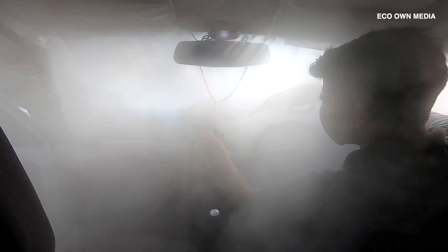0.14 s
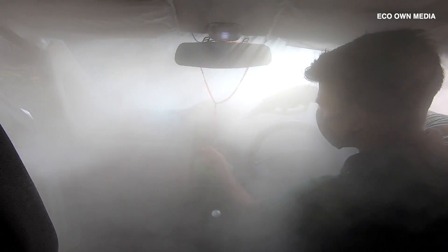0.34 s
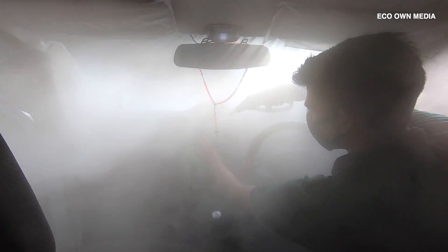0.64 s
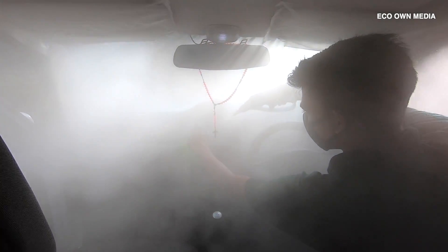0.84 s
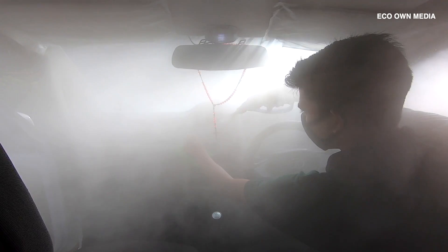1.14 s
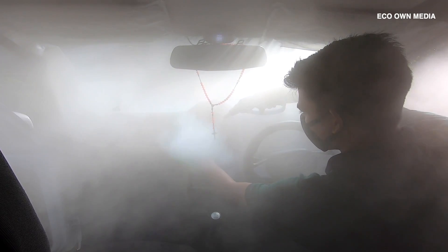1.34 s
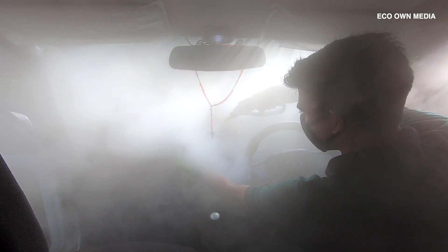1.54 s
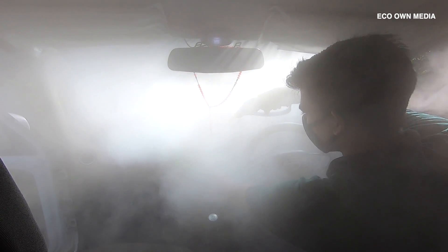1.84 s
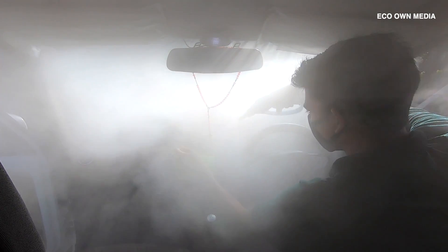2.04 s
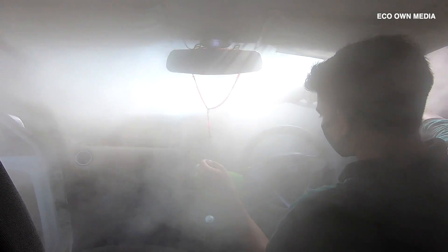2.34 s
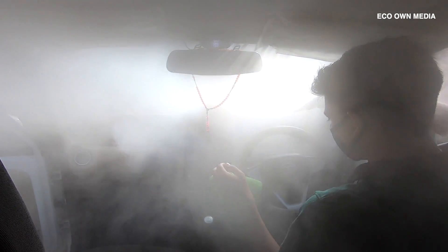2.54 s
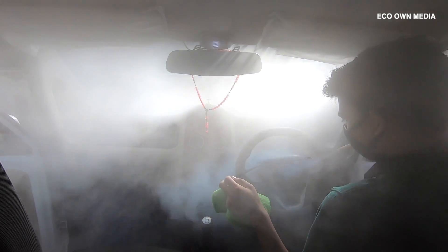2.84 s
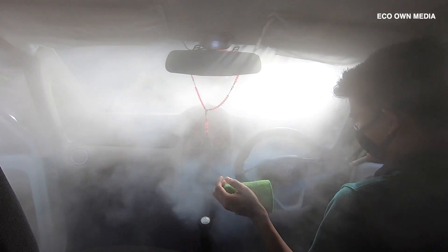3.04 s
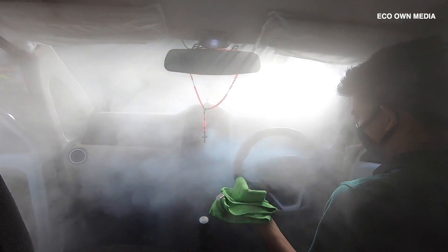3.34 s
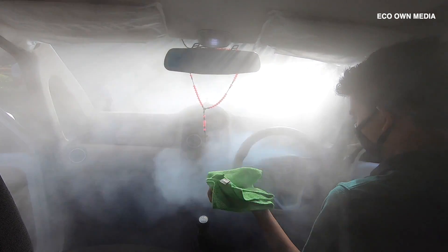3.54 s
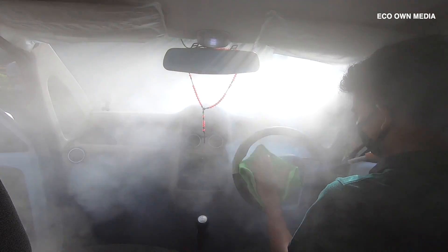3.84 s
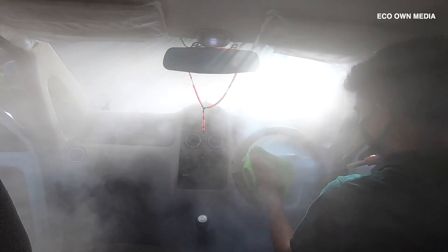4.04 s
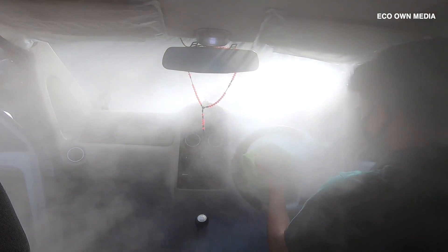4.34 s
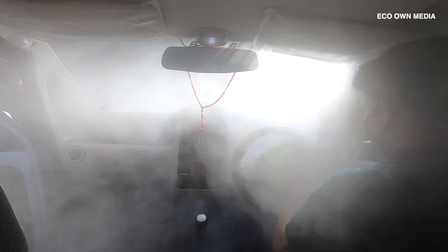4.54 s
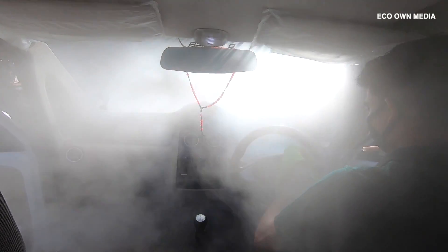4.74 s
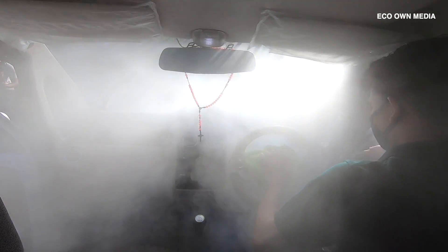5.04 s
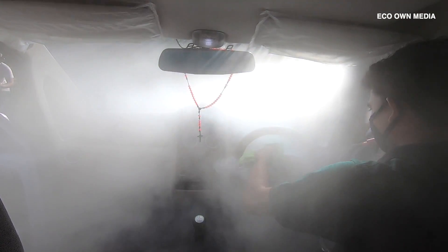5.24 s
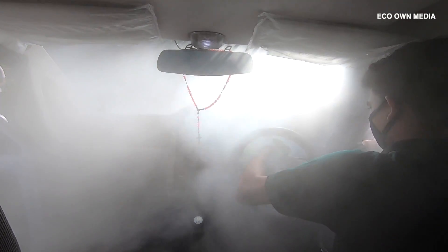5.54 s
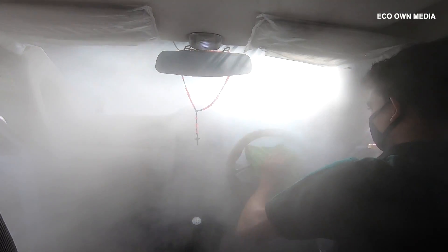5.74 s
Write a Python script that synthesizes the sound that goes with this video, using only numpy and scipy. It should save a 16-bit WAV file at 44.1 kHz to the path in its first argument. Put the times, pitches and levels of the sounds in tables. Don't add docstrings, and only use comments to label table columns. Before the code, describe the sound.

Constant dense rush of pressurized steam against dashboard trim, briefly thinning and ringing at vents, with a faint pump drone and soft low puffs.

```python
import sys
import numpy as np
from scipy import signal
from scipy.fft import rfft, irfft, next_fast_len
from scipy.io import wavfile
from scipy.ndimage import uniform_filter1d, map_coordinates

SR = 44100
rng = np.random.default_rng(int(sys.argv[2]) if len(sys.argv) > 2 else 0)


def volts_from_db(level):
    exponent = np.asarray(level, float) / 20
    return 10 ** exponent


def unload_audio(sound):
    columns = np.transpose(np.atleast_2d(sound))
    steps = np.round(np.clip(columns, -1, 1) * 32767)
    wavfile.write(sys.argv[1], SR, steps.astype(np.int16))


N = 260190

# (time [s], splash on the trim [dB], hollowness of the panel it hits [dB],
# steam cloud around the microphone [dB])
NOZZLE_POSE = [(0, -25, -4, 1), (.4, -21, -6.5, 1), (.53, -26, -8.5, 1.5), (.98, -28, 0.5, -1.5),
               (1.3, -26, -2.5, 1), (1.5, -23.5, -9.5, -2.5), (1.95, -23, -12, -2), (2.25, -35, -2.5, -3.5),
               (2.45, -32.5, -3, -4), (2.66, -26.5, -8.5, -3), (3.4, -26, -11, -6),
               (3.65, -21.5, -12.5, -9), (4.05, -23, -11, -6), (4.52, -20.5, -12.5, -7),
               (4.7, -20, -6.5, -4.5), (5.3, -19.5, -10, -7), (5.6, -20, -9.5, -4), (5.9, -26, 1, -4)]
# (start [s], stop [s], splash lost [dB], ring of the vent's duct [dB])
VENT_VISITS = [(2.42, 2.465, -5, 0), (2.5, 2.64, 5, 1), (2.69, 2.81, 8, 0), (2.89, 3.01, 7, 1),
               (3.055, 3.185, 11, 10), (3.255, 3.38, 12, 11), (3.46, 3.575, 10, 8.5), (3.68, 3.79, 14, 9.5),
               (3.9, 3.96, 5, 1), (4.09, 4.17, 5, 4), (4.19, 4.23, -3, 0), (4.595, 4.665, 15, 1),
               (4.79, 4.855, 11, 0), (5.365, 5.43, 14, 2), (5.56, 5.685, 13, 2), (5.8, 5.95, 15, 2)]
# (frequency [Hz], level [dB])
LOW_SPLASH = [(180, -4), (300, -17), (380, -2), (434, -11), (518, -4), (775, 1), (839, -1.5), (914, -1),
              (1050, 2), (1370, -5), (1450, -4.5), (1880, -30), (3190, -120)]
HIGH_SPLASH = [(780, -26), (1330, -5.5), (1370, -9.5), (1600, 1), (1860, 1), (2000, 4), (2400, 1.5),
               (3120, -14), (5280, -120)]
CORE_HISS = [(1290, -24), (2200, -7.5), (2550, -1), (2740, -4.5), (2970, -1.5), (3450, -1), (3890, -2.5),
             (4720, -0.5), (5100, -2.5), (5750, -15), (6600, -18), (8580, -46), (14500, -120)]
DROPLET_FIZZ = [(3530, -22), (6000, -3.5), (6760, -3), (8040, 1.5), (11400, -6.5), (12800, -12),
                (15400, -42)]


def jet():
    splash_db, hollow_db, cloud_db = curves(NOZZLE_POSE)
    t = np.arange(N) / SR
    lost_db = sum(db * between(t, start, stop, edge_s=.013) for start, stop, db, _ in VENT_VISITS)

    low_db = splash_db + hollow_db - 0.79 * lost_db
    high_db = splash_db - lost_db
    core_db = -18.5 - 0.11 * np.maximum(high_db - splash_db.mean(), 0)
    fizz_db = -25 + cloud_db + 0.075 * lost_db + 1.1 * wobble(9)

    sputter = wobble(14)
    low = volts_from_db(low_db + 0.45 * sputter) * noise(LOW_SPLASH)
    high = volts_from_db(high_db + 0.92 * sputter) * noise(HIGH_SPLASH)
    core = volts_from_db(core_db + 0.63 * wobble(13)) * noise(CORE_HISS)
    droplets = volts_from_db(0.26 * wobble(24) + 0.85 * wobble(300))
    fizz = volts_from_db(fizz_db) * unit(droplets * noise(DROPLET_FIZZ))
    return low + high + core + fizz


def echoes(x):
    size, overlap = 4096, 3072
    z = signal.stft(x, nperseg=size, noverlap=overlap)[2]
    comb_db = 1.9 * field(z.shape, bins=3, frames=8)
    return signal.istft(z * volts_from_db(comb_db), nperseg=size, noverlap=overlap)[1][:N]


# (frequency [Hz], width [Hz], share of the ring level [ratio])
DUCT_BANDS = [
    (3250, 150, .75),
    (3430, 220, .75),
    (2600, 450, -.5),
]
# (start [s], stop [s], frequency [Hz], level [dB])
HOLLOW_RINGS = [(0, 1.103, 843, 9.5), (0, .53, 2300, 5), (0, .53, 2480, 1.5), (0, .53, 4140, 8),
                (0, .53, 4520, 2), (.53, .88, 3600, 5.5), (.88, 1.197, 3330, 2), (.84, 1.36, 10160, 7),
                (.53, .9, 2550, 4), (1.452, 2.043, 2610, 6), (.94, 2.04, 2840, 3.5), (1.14, 2.24, 5650, 7),
                (1.29, 2.035, 1580, 7.5), (1.44, 2.187, 7340, 10), (1.93, 3.028, 4980, 6),
                (2.19, 2.54, 5400, 6), (2.22, 2.738, 2300, 6.5), (2.55, 3.02, 4200, 7.5),
                (2.55, 3.02, 4570, 0), (2.72, 3.825, 590, 6), (3.677, 4.774, 1925, 6.5),
                (3.78, 4.89, 4000, 3.5), (3.95, 5.05, 4300, 6.5), (4.41, 5.51, 1056, 6.5),
                (4.66, 5.37, 1680, 4), (4.84, 5.36, 2800, 4), (5.43, 5.782, 5170, 7),
                (5.5, 5.72, 4700, 4.5), (5.74, 5.95, 3220, 9.5), (3.85, 4.18, 3370, 7)]
# (start [s], stop [s], frequency [Hz], loss [dB])
SHADOWS = [(0, .54, 1930, 11), (.37, 1.47, 6570, 4), (.53, 1.64, 3900, 7.5), (1.29, 2.042, 1870, 8),
           (1.52, 2.62, 3180, 3.5), (2.71, 3.81, 885, 3), (2.703, 3.81, 2340, 5.5), (3.08, 4.18, 2720, 2),
           (3.47, 4.57, 4850, 7), (4.4, 5.16, 850, 8), (4.6, 5.35, 3220, 9), (5.15, 5.68, 5570, 6),
           (5.45, 5.75, 1410, 4)]
# (start [s], stop [s], frequency
# [Hz], width [Hz], level [dB])
EARLY_TOP = (-2.5, 1, 14900, 1400, 11)


def cabin(x):
    size, overlap = 1024, 768
    hz, t, z = signal.stft(x, SR, nperseg=size, noverlap=overlap)
    ripple_db = 1.1 * field(z.shape, bins=2, frames=24)
    swirl_db = 1.2 * field(z.shape, bins=8, frames=8)
    top_share = np.clip(hz[:, None] / 2500 - 4.6, 0, 1)
    flicker_db = 3.5 * field(z.shape, bins=30, frames=5) * top_share
    gain_db = ripple_db + swirl_db + flicker_db

    bands = [EARLY_TOP]
    for start, stop, at_hz, db in HOLLOW_RINGS:
        bands.append((start, stop, at_hz, 78 + 0.012 * at_hz, db))
    for start, stop, at_hz, loss_db in SHADOWS:
        bands.append((start, stop, at_hz, 126 + 0.012 * at_hz, -loss_db))
    for start, stop, _, ring_db in VENT_VISITS:
        for at_hz, width_hz, share in DUCT_BANDS:
            bands.append((start, stop, at_hz, width_hz, share * ring_db))

    for start, stop, at_hz, width_hz, db in bands:
        peak = 1 / (1 + (2 * (hz - at_hz) / width_hz) ** 2)
        aimed = between(t, start, stop, edge_s=.018)
        gain_db = gain_db + db * np.outer(peak, aimed)
    return signal.istft(z * volts_from_db(gain_db - 1.53), SR, nperseg=size, noverlap=overlap)[1][:N]


# (time [s], length [s], level over the rumble [dB])
PUFFS = [
    (.2, .25, 3),
    (.72, .1, 4),
    (2.6, .12, 4),
    (2.92, .05, 7),
    (3.065, .022, 12),
    (3.32, .05, 6),
    (3.72, .04, 3),
    (4.3, .15, 2),
    (5.4, .06, 4),
]


def puffs():
    t = np.arange(N) / SR
    return sum(db * np.exp(-.5 * ((t - at_s) / length_s) ** 2) for at_s, length_s, db in PUFFS)


def pump():
    cloud_db = curves(NOZZLE_POSE)[-1]
    drone_db = -32 + 0.79 * cloud_db + .3 * puffs()
    pitch_hz = 49.8 + .8 * wobble(9)
    phase = 2 * np.pi * np.cumsum(pitch_hz) / SR
    return volts_from_db(drone_db - 3.0 + 1.3 * wobble(6.2)) * np.sin(phase)


# (frequency [Hz], level [dB])
CLOUD_RUMBLE = [(12, -33), (20, -6), (60, -1), (97, -4.5), (213, -6.5), (301, -14.5), (363, -15),
                (437, -16.5), (480, -17.5), (620, -29), (1060, -120)]


def steam_cloud():
    cloud_db = curves(NOZZLE_POSE)[-1]
    rumble_db = -33.5 + 0.75 * cloud_db + puffs()
    lumps = volts_from_db(1.6 * wobble(9.9))
    return volts_from_db(rumble_db) * unit(lumps * noise(CLOUD_RUMBLE))


def side_hiss():
    colour = [(30, -1), (300, -4.5), (1000, -9.5), (4000, -20), (9000, -15), (14500, -21)]  # (Hz, dB)
    fitful = wobble(8) > .1
    return volts_from_db(-53.5 + 4.5 * wobble(25)) * fitful * noise(colour)


def unit(x):
    return x / np.sqrt(np.mean(np.abs(x) ** 2) + 1e-20)


def curves(rows):
    s, *cols = np.transpose(rows)
    return [np.interp(np.arange(N) / SR, s, c) for c in cols]


def between(t, start, stop, edge_s):
    return .5 * (np.tanh((t - start) / edge_s) - np.tanh((t - stop) / edge_s))


def wobble(rate):
    knots = rng.standard_normal(int(N * rate / SR) + 4)
    return map_coordinates(knots, [np.arange(N) * rate / SR])


def noise(spectrum):
    m = next_fast_len(N)
    f, db = np.transpose(spectrum)
    bin_hz = np.fft.rfftfreq(m, 1 / SR)
    gain = volts_from_db(np.interp(np.log(bin_hz + 1), np.log(f + 1), db, -120, -120))
    return unit(irfft(rfft(rng.standard_normal(m)) * gain, m)[:N])


def field(shape, bins, frames):
    smooth = rng.standard_normal(shape)
    for width, axis in [(bins, 0), (bins, 0), (frames, 1), (frames, 1)]:
        smooth = uniform_filter1d(smooth, width, axis)
    return unit(smooth)


def scene():
    mono = cabin(echoes(jet())) + pump() + steam_cloud()
    return np.array([mono, mono])


def roll_off(x):
    return signal.sosfilt(signal.butter(12, 15600, fs=SR, output="sos"), x)


def record(dry):
    power = uniform_filter1d(dry[0] ** 2, SR // 25, mode="reflect")
    level = np.sqrt(np.abs(power) + 1e-9)
    even = dry * (volts_from_db(-16.0) / level) ** 0.72
    rounded = even / (1 + np.abs(even / .66) ** 6) ** (1 / 6)
    hiss = side_hiss()
    return roll_off(rounded + np.array([hiss, -hiss]))


dry = scene()
out = record(dry)
unload_audio(out)
```